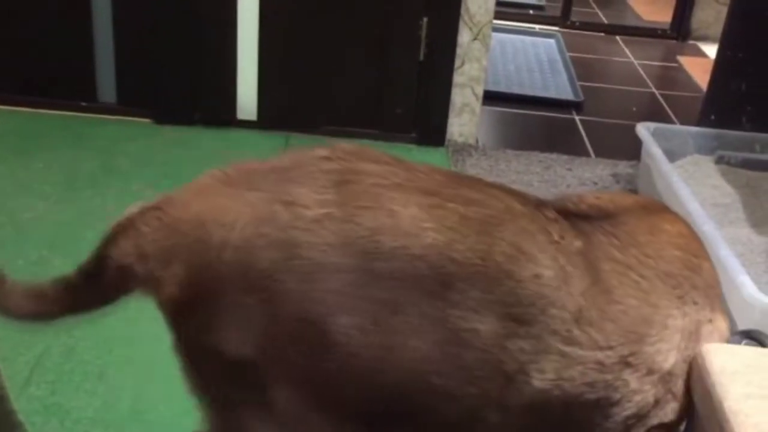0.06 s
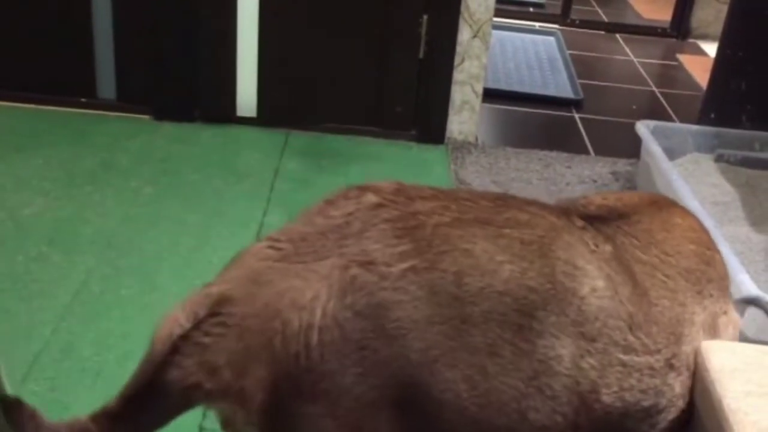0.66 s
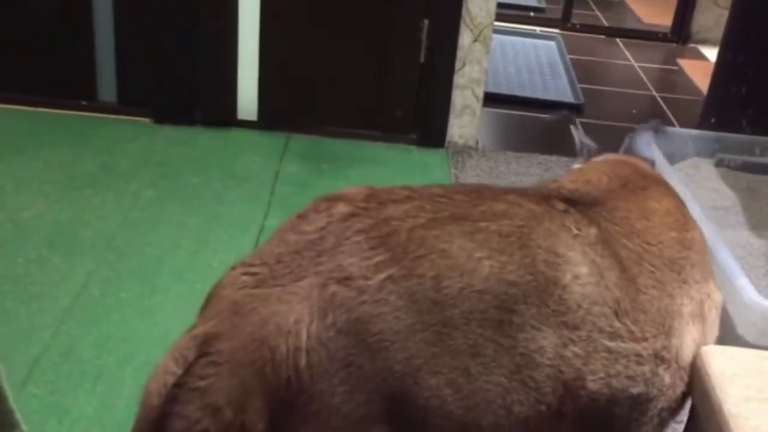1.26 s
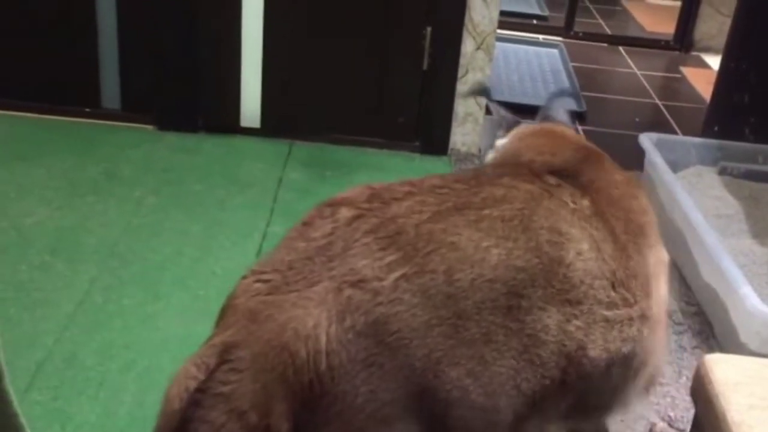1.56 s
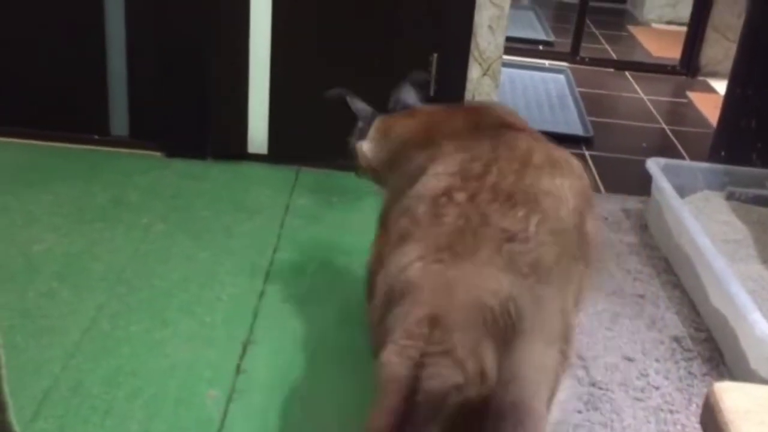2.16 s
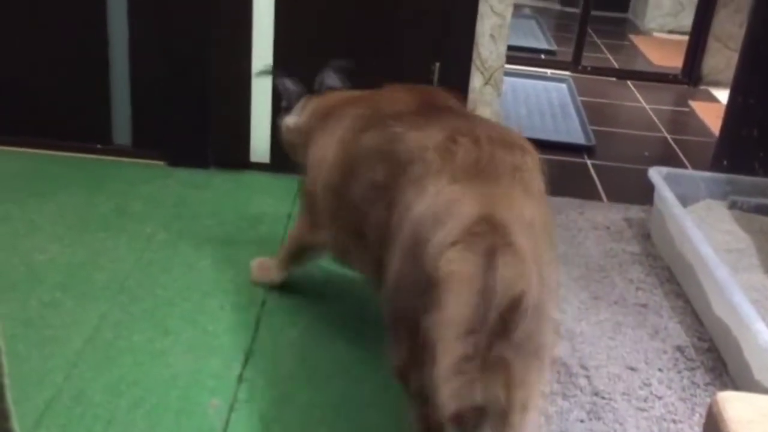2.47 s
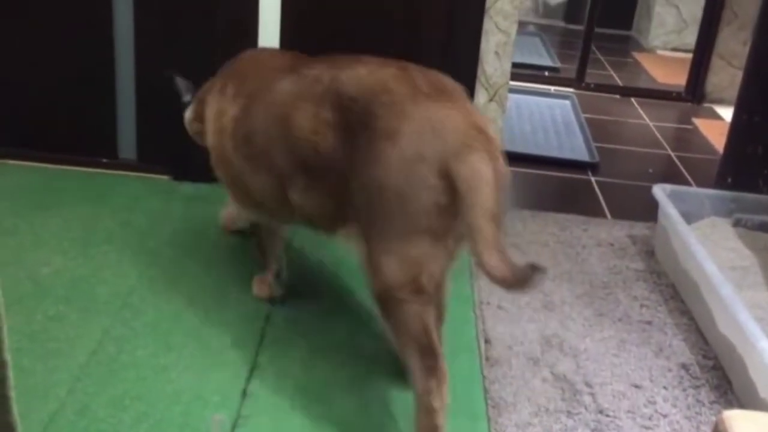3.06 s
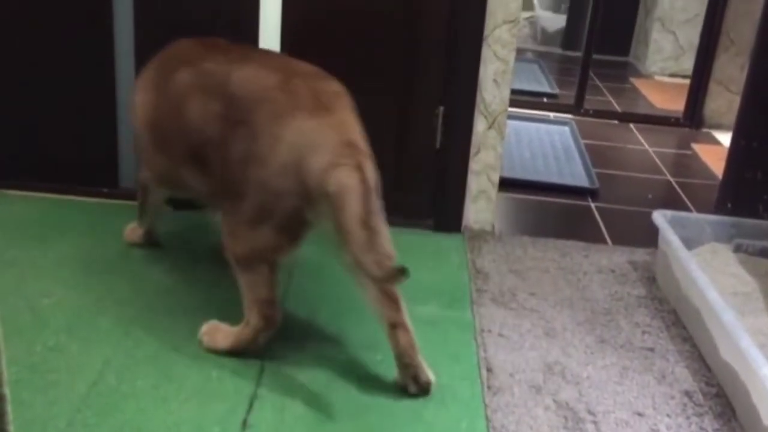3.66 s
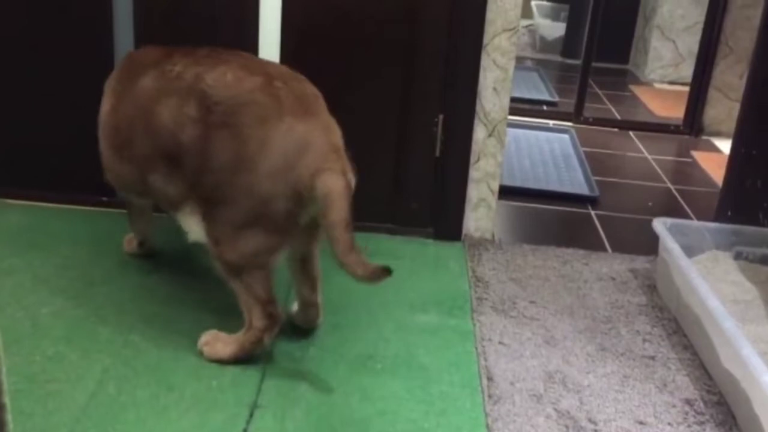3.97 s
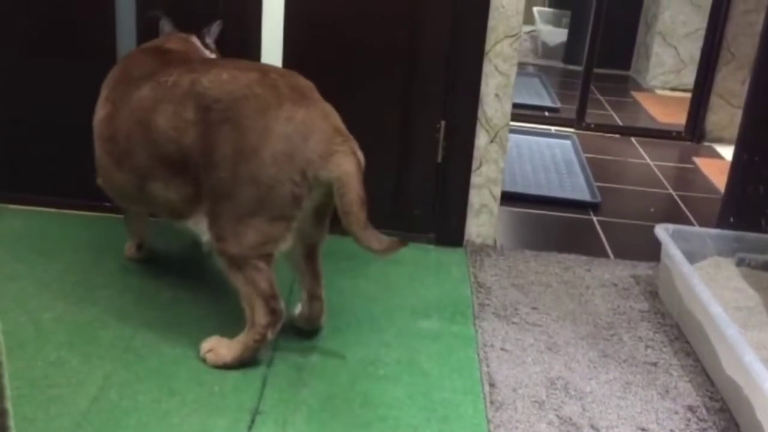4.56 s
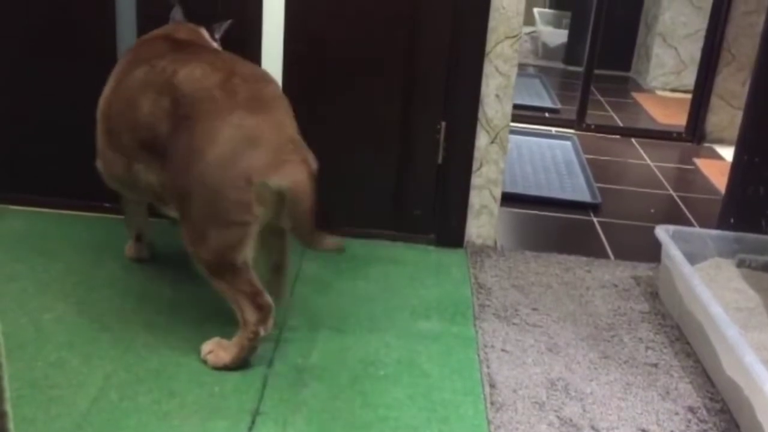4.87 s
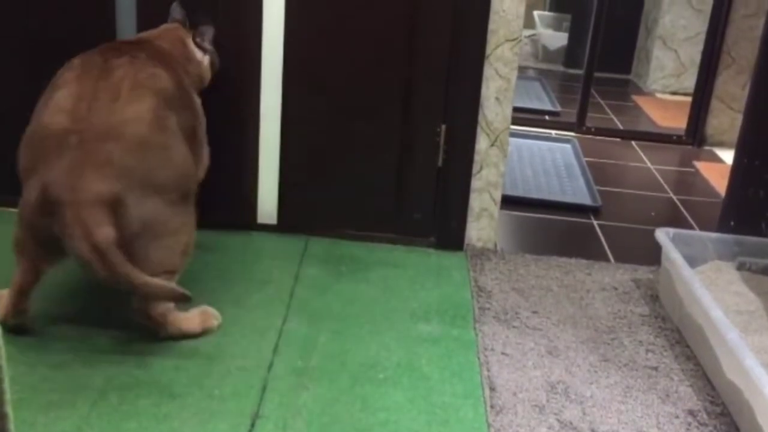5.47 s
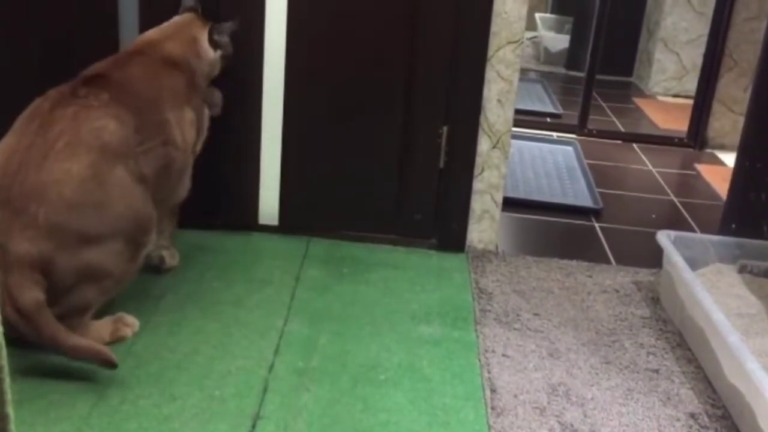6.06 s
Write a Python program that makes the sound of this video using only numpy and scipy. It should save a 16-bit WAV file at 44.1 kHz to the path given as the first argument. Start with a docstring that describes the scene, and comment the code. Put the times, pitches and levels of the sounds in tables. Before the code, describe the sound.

Soft paw steps, light claw ticks and clacks indoors, with one loud knock on a door panel and a faint steady fan hum.

```python
"""A cat at a closed door

A big cat leaves its plastic litter tray, pads across a matted floor and paws at a door in a small room.
Impacts excite damped modes: hollow tray knocks, light taps, footfalls that boom in the floor and,
loudest, one sharp knock on a panel. Friction of paws and claws gives short scuffs of noise.
The walls reflect these sounds over a quiet ventilation hum."""
import sys
import numpy as np
from scipy import signal
from scipy.fft import rfft, irfft
from scipy.io import wavfile

SR = 44100
rng = np.random.default_rng(int(sys.argv[2]) if len(sys.argv) > 2 else 0)


def digitize_waveform(pressure):
    """Quantize a signal to 16-bit integers and store it at the path in sys.argv[1].

    Rows of a 2-D input are taken as channels; values are limited to [-1, 1].
    """
    field = np.atleast_2d(pressure).T
    bounded = np.clip(field, -1, 1)
    quanta = np.round(bounded * 32767).astype(np.int16)
    wavfile.write(sys.argv[1], SR, quanta)


N = 278271

# reverberation time of the room: f/Hz, T60/s
ROOM_T60 = [(100, 0.74), (400, 0.2), (1000, 0.14), (2500, 0.17), (5000, 0.094), (12000, 0.2)]
# ventilation noise: f/Hz, relative level/dB
AIR_SPECTRUM = [(12, -56), (20, -14), (53, 2.5), (112, -1), (238, -7), (298, -10), (342, -7.5),
                (372, -13.5), (705, -17), (857, -17.5), (932, -17), (1670, -19), (2610, -21.5), (5000, -27),
                (6300, -27.5), (10200, -34), (11700, -34.5), (15500, -40)]
# fan tones: f/Hz, rms level/dB
FAN_TONES = [(49, -79), (65, -87), (122, -67), (171, -96), (242, -73.5), (339, -69)]

# friction noise of a paw: f/Hz, relative level/dB
RUB_SPECTRUM = [(100, 13), (350, -15), (900, -4), (2200, -6.5), (3500, -33), (6000, -73), (15000, -79)]
# hiss of claws: f/Hz, relative level/dB
HISS_SPECTRUM = [(1000, 13.5), (3500, 3), (6500, -3), (10000, -3), (14500, -1), (17000, -41)]
# faint pitched rubs: t/s, level/dB, f/Hz
SQUEAKS = [(0.508, -58, 713), (0.771, -62, 1504), (2.244, -59, 2540), (4.063, -46.5, 729),
           (5.214, -51.5, 624)]
# paws dragging on the mat: t/s, level/dB, length/s, resonance/Hz, relative hiss/dB
SCUFFS = [(1.626, -55, 0.06, 1640, -8), (1.697, -51, 0.03, 1690, -4), (2.048, -52, 0.069, 2550, 12),
          (2.588, -46.5, 0.034, 1930, 0), (3.1, -50.5, 0.068, 1670, 3), (3.397, -46.5, 0.04, 1130, -10),
          (3.85, -49.5, 0.055, 1650, -2), (3.962, -52.5, 0.044, 445, 0), (4.048, -48, 0.035, 1780, -4),
          (4.459, -60, 0.3, 2130, 5), (4.966, -57, 0.05, 1160, 7), (5.193, -44.5, 0.029, 3270, 1),
          (5.408, -44, 0.052, 1520, 2)]
SCUFF_CUTOFF_HZ = 7600  # low-pass on the hiss of a sliding paw
# claws raking the door: t/s, level/dB, rise/s, fall/s, rasp/Hz, relative half-width
SCRATCHES = [(5.779, -41.5, 0.012, 0.013, 2060, 0.064), (5.856, -42, 0.011, 0.0083, 1950, 0.13)]
# grit crushed under a paw: t/s, level/dB, fall/s
CRUNCHES = [(2.032, -48, 0.018), (2.0551, -42, 0.011), (2.068, -34, 0.0068)]
# cracking grit: f/Hz, relative level/dB
GRIT_SPECTRUM = [(300, -19), (800, 11), (1400, -5), (2700, 4.5), (3250, -19), (3900, -12), (4850, -18),
                 (6500, -12), (8000, -40), (12000, -26), (14500, -27), (16000, -32)]

# claw tips catching: t/s, level/dB, pitch ratio
CLAW_TICKS = [(0.2981, -33.5, 1.1), (0.3028, -28, 0.914), (0.3115, -42, 0.65), (1.5183, -41.5, 0.93),
              (2.034, -46, 0.78), (2.5741, -37, 0.65), (3.074, -40.5, 0.57), (3.388, -51, 0.74),
              (5.1894, -34, 0.82), (5.1912, -31.5, 0.94), (5.4103, -31, 0.87), (5.846, -42, 1.6)]
# modes struck by a claw tip: f/Hz, level/dB, T60/s
CLAW_MODES = [(1170, -10, 0.0099), (2380, 7, 0.0021), (4170, -1.5, 0.0078), (4800, -12, 0.014),
              (6200, -7.5, 0.0062), (12100, -11, .003)]
# light hard taps: t/s, level/dB, pitch ratio, contact cutoff/Hz, delay of second touch/s (0: none)
TAPS = [(0.2992, -32.5, 0.53, 1000, 0.0042), (0.3021, -24.5, 1.62, 1700, 0.00037),
        (0.3115, -36, 0.95, 1500, 0), (2.2365, -34.5, 1.27, 1500, 0.0009), (2.6, -31, 1.13, 4200, 0.0036),
        (3.088, -39.5, 1.03, 2330, 0.00042), (3.3963, -37, 1.48, 1100, 0.012), (3.8434, -37, 2.34, 1500, 0),
        (3.9648, -41, 0.73, 900, 0.0044), (4.0252, -35, 1, 3000, 0.019),
        (4.0429, -31.5, 0.66, 1100, 0.0018), (4.056, -40.5, 0.86, 900, 0.0038),
        (5.1451, -32, 1.16, 840, 0.0105), (5.2095, -40, 0.87, 900, 0), (5.3865, -39, 1.42, 1500, 0),
        (5.7378, -33.5, 1.64, 2300, 0.002), (5.7507, -40, 1.22, 2000, 0.002),
        (5.7655, -33, 1.01, 1600, 0.0035), (5.855, -39, 1.4, 1800, 0)]
# modes of a tap: f/Hz, level/dB, T60/s
TAP_MODES = [(431, -8, 0.033), (691, 12, 0.012), (845, 1, 0.01), (1640, 8, 0.0079), (2450, -0.5, 0.014),
             (3800, -14, 0.015), (6100, 0, 0.013)]
# the cat shifts its weight and leaves the tray: t/s, level/dB, pitch ratio, contact cutoff/Hz
TRAY_KNOCKS = [(0.5326, -38, 1, 900), (0.5525, -40.5, 0.92, 767), (1.609, -29.5, 1.01, 2400),
               (1.6325, -30, 0.99, 2300), (1.6912, -27.5, 1, 2700)]
# modes of the tray: f/Hz, level/dB, T60/s
TRAY_MODES = [(416, -1, 0.012), (692, -6.5, 0.06), (802, 8.5, 0.0098), (1100, -22, 0.012),
              (1620, -11, 0.012), (2240, -5, 0.0099)]
# a loose hard object underfoot: t/s, level/dB, pitch ratio, contact cutoff/Hz
CLACKS = [(2.0551, -22, 0.97, 4570), (2.0615, -31, 1, 4000), (2.0668, -20, 0.98, 4970),
          (2.0835, -31.5, 0.92, 3000)]
# modes of the loose object: f/Hz, level/dB, T60/s
CLACK_MODES = [(424, -9, 0.05), (517, 0.5, 0.026), (793, -3, 0.037), (924, 0, 0.017), (1300, -10, 0.029),
               (1830, -3, 0.031), (2080, 1.5, 0.011), (2800, -5.5, 0.021), (3830, -5.5, 0.012),
               (6400, -4.5, 0.0043)]
# a lone dry click: t/s, level/dB, pitch ratio, bass cutoff/Hz, contact cutoff/Hz
CLICK = [(2.4764, -21, 0.94, 480, 3600)]
# modes of the click: f/Hz, level/dB, T60/s
CLICK_MODES = [(483, -8, 0.035), (900, 5.5, 0.011), (1340, 1, 0.0087), (2590, 4, 0.0072),
               (2950, -12, 0.007), (5250, -10.5, 0.011)]

# steps: t/s, level/dB, pitch ratio, roll time/s, pad scuff/dB, boom f/Hz, boom level/dB, boom T60/s
FOOTFALLS = [(0.2993, -26, 1.05, 0.0088, -33, 117.5, -26.5, 0.23),
             (2.2237, -29, 1.1, 0.026, -40.5, 95, -21.5, 0.12),
             (2.881, -40, 0.87, 0.0067, -46.5, 115, -56, 0.15),
             (4.028, -35.5, 1.17, 0.02, -40, 103, -34.5, 0.11),
             (5.153, -38, 1.08, 0.01, -50, 81, -39, 0.14), (5.194, -45, 0.98, 0.022, -44, 92.5, -41, 0.13),
             (5.384, -43.5, 1.17, 0.0072, -51, 130, -45.5, 0.15),
             (5.847, -42, 0.76, 0.0034, -39, 132, -40, 0.059)]
# toes, pad, full weight: share of the roll, relative level/dB, pitch ratio, bass cutoff/Hz,
# contact cutoff/Hz
PAW_ROLL = [(0, -2, 1.007, 213, 785), (0.547, -5.5, 1.196, 138, 423), (0.999, 0, 0.968, 90, 264)]
# modes of the floor: f/Hz, level/dB, T60/s
FLOOR_MODES = [(132.6, 2.5, 0.078), (163, -2.5, 0.028), (189.4, -1.5, 0.094), (311, -0.5, 0.058),
               (345, -3.5, 0.16)]

# the blow on the panel: t/s, level/dB, pitch ratio, bass cutoff/Hz, contact cutoff/Hz
KNOCK = [(2.6092, -4.2, 1, 240, 2600)]
# the panel's broad, quickly damped modes and its faint lasting ones: f/Hz, level/dB, T60/s
PANEL_MODES = [(385, -1, .026), (480, -5, .02), (700, -14, .014), (960, -8, .011), (1400, -11, .009),
               (1900, -5, .008), (2250, -11, .01), (2900, -18, .008), (3800, -21, .007), (206, -12, .125),
               (290, -31, .18), (357, -31, .3), (393, -27, .28), (483, -29, .18), (573, -30, .17),
               (596, -29, .2), (688, -36, .22), (855, -26, .15), (912, -29, .15), (1004, -25, .13),
               (1050, -28, .13), (1190, -34, .12), (1770, -33, .11), (1915, -34, .1), (2044, -31, .12),
               (2155, -32, .13)]
# first reflections off the floor and the nearest wall: delay/s, relative level/dB
KNOCK_ECHOES = [(0.0069, -12), (0.0118, -13)]


def undb(db):
    """Amplitude ratio of a level in decibels."""
    return 10 ** (np.asarray(db) / 20)


def unit(x):
    """Normalisation to rms 1."""
    return x / np.sqrt(np.mean(x ** 2))


def along(hz, points):
    """Interpolation of (f/Hz, value) points on a logarithmic frequency axis."""
    f, value = np.transpose(points)
    return np.interp(np.log(np.maximum(hz, 1)), np.log(f), value)


def colour(x, spectrum):
    """Spectral shaping by (f/Hz, level/dB) points, at rms 1."""
    gain = undb(along(np.fft.rfftfreq(len(x), 1 / SR), spectrum))
    return unit(irfft(rfft(x) * gain, len(x)))


def cut(x, hz, kind, order=2):
    """Butterworth filtering."""
    return signal.sosfilt(signal.butter(order, np.minimum(hz, SR / 2 - 1), kind, fs=SR, output="sos"), x)


def add(track, s, sound):
    """Superposition of a sound on a track at time s."""
    start = int(s * SR)
    part = sound[:len(track) - start]
    track[start:start + len(part)] += part


def drift(rate_hz):
    """Slow random fluctuation: low-passed noise at rms 1."""
    gain = np.exp(-(np.fft.rfftfreq(N, 1 / SR) / rate_hz) ** 2)
    return unit(irfft(rfft(rng.standard_normal(N)) * gain, N))


def even_noise(count, size=512):
    """Random-phase noise: a flat spectrum in each short block leaves it without pitch."""
    phases = rng.random((count // size + 1, size // 2 + 1))
    return unit(irfft(np.exp(2j * np.pi * phases), size).ravel()[:count])


def room(x, wet_db, low_hz, high_hz, gap_s=0.00059, build_s=0.00024):
    """Reverberation: dense reflections follow the direct sound, each band decaying at its own rate."""
    t = np.arange(SR // 2) / SR
    onset = np.clip((t - gap_s) / build_s, 0, 1)
    edges = np.geomspace(60, 16000, 11)
    tail = 0
    for lo, hi in zip(edges, edges[1:]):
        decay = np.exp(-np.log(1000) * t / along(np.sqrt(lo * hi), ROOM_T60))
        band = cut(even_noise(len(t)), [lo, hi], "bandpass") * decay * onset
        tail = tail + band * np.sqrt(2 * (hi - lo) / SR / np.sum(band ** 2))  # equal energy per hertz
    tail = cut(cut(tail, low_hz, "highpass"), high_hz, "lowpass", order=1)
    return x + undb(wet_db) * signal.fftconvolve(x, tail)[:N]


def ring(modes, pitch=1):
    """Free vibration: the impulse response is a sum of exponentially damped sinusoids."""
    t = np.arange(SR // 2) / SR
    return sum(undb(db) * np.sin(2 * np.pi * hz * pitch * t) * np.exp(-np.log(1000) * t / t60)
               for hz, db, t60 in modes)


def impacts(rows, modes, travel_s):
    """Impact excitation: a softer contact excites less treble, a lighter one less bass."""
    out = np.zeros(N)
    for s, db, pitch, low_hz, contact_hz in rows:
        blow = cut(cut(ring(modes, pitch), low_hz, "highpass"), contact_hz, "lowpass")
        # dispersion: bending waves carry treble faster than bass; travel_s is their delay at 1 kHz
        lag_cycles = 2 * travel_s * np.sqrt(1000 * np.fft.rfftfreq(len(blow), 1 / SR))
        blow = irfft(rfft(blow) * np.exp(-2j * np.pi * lag_cycles), len(blow))
        add(out, s, blow * undb(db) / np.abs(blow).max())
    return out


def friction(rows, resonance_db, width, glide_per_s=0):
    """Sliding friction: dense, uneven slips drive a broad rub, one resonance and the hiss of claws."""
    out = np.zeros(N)
    t = np.arange(-SR // 8, SR // 4) / SR  # zero at the greatest pressure
    for s, db, rise_s, fall_s, hz, hiss_db, cutoff_hz in rows:
        slips = rng.standard_normal((3, len(t))) * rng.exponential(size=len(t))
        resonance = unit(cut(slips[0], [hz / (1 + width), hz * (1 + width)], "bandpass", order=1))
        resonance = np.interp(t + glide_per_s * t ** 2 / 2, t, resonance)
        hiss = cut(colour(slips[2], HISS_SPECTRUM), cutoff_hz, "lowpass")
        rub = colour(slips[1], RUB_SPECTRUM) + undb(resonance_db) * resonance + undb(hiss_db) * hiss
        pressure = np.exp(-(np.minimum(t, 0) / rise_s) ** 2 - np.maximum(t, 0) / fall_s)
        add(out, s + t[0], undb(db) * pressure * unit(rub))
    return room(out, wet_db=-3.0, low_hz=240, high_hz=4040)


def ventilation(air_db=-54.5, waver=0.29, phase_rad=1.46):
    """Broadband flow noise with fan tones under slow, random amplitude and phase modulation."""
    t = np.arange(N) / SR
    out = colour(rng.standard_normal(N), AIR_SPECTRUM) * undb(air_db)
    for hz, db in FAN_TONES:
        amplitude = undb(db) * np.sqrt(2) * (1 + waver * drift(1.6))
        out += amplitude * np.sin(2 * np.pi * hz * t + phase_rad * drift(1.95))
    return out


def squeaks(rise_s=0.032, fall_s=0.011, hiss_db=-15):
    """Sharp resonance: one narrow band dominates a slow rub and gives it a pitch."""
    rows = [(s, db, rise_s, fall_s, hz, hiss_db, SCUFF_CUTOFF_HZ) for s, db, hz in SQUEAKS]
    return friction(rows, resonance_db=23, width=0.004)


def scuffs(rise_share=0.4, fall_share=0.39):
    """Friction of paws on the mat: a longer drag swells and fades more slowly."""
    rows = [(s, db, rise_share * length_s, fall_share * length_s, hz, hiss_db, SCUFF_CUTOFF_HZ)
            for s, db, length_s, hz, hiss_db in SCUFFS]
    return friction(rows, resonance_db=-2.5, width=0.049)


def pad_scuffs(peak_share=0.72, rise_share=0.75, fall_share=0.56, resonance_hz=705, hiss_db=-16):
    """Friction of a landing pad, which slides a little for as long as the paw rolls."""
    rows = [(s + peak_share * roll_s, db, rise_share * roll_s, fall_share * roll_s,
             resonance_hz, hiss_db, SCUFF_CUTOFF_HZ) for s, _, _, roll_s, db, *_ in FOOTFALLS]
    return friction(rows, resonance_db=-5.0, width=0.061)


def scratches(hiss_db=1.5, cutoff_hz=13000):
    """Friction of claws on the door: the rasp rises in frequency as the stroke speeds up."""
    strokes = np.zeros(N)
    for s, db, rise_s, fall_s, hz, width in SCRATCHES:
        stroke = (s, db, rise_s, fall_s, hz, hiss_db, cutoff_hz)
        strokes += friction([stroke], resonance_db=3.0, width=width, glide_per_s=5.7)
    return cut(strokes, 600, "highpass")


def crunches(spread_db=3.0):
    """Brittle fracture: grit cracks under a paw in a dense, uneven burst that dies away."""
    out = np.zeros(N)
    t = np.arange(SR // 8) / SR
    for s, db, fall_s in CRUNCHES:
        grains = rng.standard_normal(len(t))
        grains *= undb(spread_db * np.minimum(rng.exponential(size=len(t)), 5))
        add(out, s, undb(db) * np.exp(-t / fall_s) * colour(grains, GRIT_SPECTRUM))
    return room(out, wet_db=0.5, low_hz=400, high_hz=6000)


def claw_ticks(low_hz=1000, contact_hz=3470):
    """Light, hard contact: a catching claw excites high, short-lived modes."""
    rows = [(s, db, pitch, low_hz, contact_hz) for s, db, pitch in CLAW_TICKS]
    direct = impacts(rows, CLAW_MODES, travel_s=0.001249)
    return room(direct, wet_db=-0.5, low_hz=397, high_hz=4000)


def taps(low_hz=427, second_touch_db=-5.5):
    """Light impacts, many landing twice, ring hollowly and blend with their reflections."""
    rows = []
    for s, db, pitch, contact_hz, again_s in TAPS:
        rows.append((s, db, pitch, low_hz * pitch, contact_hz))
        if again_s > 0:
            rows.append((s + again_s, db + second_touch_db, pitch, low_hz * pitch, contact_hz))
    direct = impacts(rows, TAP_MODES, travel_s=0.000978)
    return room(direct, wet_db=0.0, low_hz=407, high_hz=6000, gap_s=0.00096, build_s=0.0018)


def litter_tray(low_hz=378, rebound_s=0.00261, rebound_db=-7):
    """Impact and rebound: each knock excites the hollow modes of the plastic tray twice."""
    rows = []
    for s, db, pitch, contact_hz in TRAY_KNOCKS:
        rows.append((s, db, pitch, low_hz, contact_hz))
        rows.append((s + rebound_s, db + rebound_db, pitch, low_hz, contact_hz))
    direct = impacts(rows, TRAY_MODES, travel_s=0.000754)
    return room(direct, wet_db=-5.0, low_hz=450, high_hz=5000, gap_s=0.0045, build_s=0.0016)


def clacks(low_hz=396):
    """Repeated impact: a loose hard object underfoot gives two strong clacks and two weak ones."""
    rows = [(s, db, pitch, low_hz * pitch, contact_hz) for s, db, pitch, contact_hz in CLACKS]
    direct = impacts(rows, CLACK_MODES, travel_s=0.001373)
    return room(direct, wet_db=-5.0, low_hz=450, high_hz=3220, gap_s=0.0031)


def click():
    """Heavy damping: the modes die so quickly that one impact is heard as a dry click."""
    direct = impacts(CLICK, CLICK_MODES, travel_s=0.001)
    return room(direct, wet_db=-5.5, low_hz=380, high_hz=4500, gap_s=0.004)


def footfalls(band_ratio=1.27):
    """Soft contact: a rolling paw excites only low floor modes, and its full weight sets off a boom."""
    rows = [(s + share * roll_s, db + part_db, pitch * part_pitch, low_hz, contact_hz)
            for s, db, pitch, roll_s, *_ in FOOTFALLS
            for share, part_db, part_pitch, low_hz, contact_hz in PAW_ROLL]
    direct = impacts(rows, FLOOR_MODES, travel_s=0.0001)
    out = room(direct, wet_db=-5.0, low_hz=228, high_hz=2000)
    for s, _, _, roll_s, _, boom_hz, boom_db, boom_t60 in FOOTFALLS:
        boom = ring([(boom_hz, boom_db, boom_t60)])
        band_hz = [boom_hz / band_ratio, boom_hz * band_ratio]  # a narrow band makes the boom swell
        add(out, s + roll_s, cut(boom, band_hz, "bandpass", order=1))
    return out


def panel_crack(level_db=-16, lag_s=0.0016, rise_s=0.00021, fall_s=0.0013):
    """Contact noise: a burst of a few milliseconds at the knock, filtered down to its bright band."""
    resonance_hz, hiss_db, cutoff_hz = 3740, -31, 2500
    rows = [(s + lag_s, level_db, rise_s, fall_s, resonance_hz, hiss_db, cutoff_hz) for s, *_ in KNOCK]
    burst = friction(rows, resonance_db=-13.5, width=0.11)
    return cut(burst, [1970, 7250], "bandpass")


def panel_knock():
    """Plate vibration: one hard blow rings the panel; its echoes and reverberation carry little bass."""
    direct = cut(impacts(KNOCK, PANEL_MODES, travel_s=0.00099), [145, 9000], "bandpass")
    out = room(direct, wet_db=-3.8, low_hz=680, high_hz=2600, gap_s=0.004, build_s=0.014)
    for delay_s, db in KNOCK_ECHOES:
        add(out, delay_s, undb(db) * cut(direct, 610, "highpass"))
    return out


def scene():
    """Superposition of all sources, the same in both channels."""
    paws = footfalls() + pad_scuffs() + scuffs() + squeaks() + claw_ticks() + scratches() + crunches()
    objects = litter_tray() + taps() + clacks() + click() + panel_knock() + panel_crack()
    mix = paws + objects + ventilation()
    return np.array([mix, mix])


def record(dry):
    """Band limiting: a phone passes neither the deepest bass nor the highest treble."""
    low_hz, top_hz = 42, 15600
    lowpass = signal.ellip(10, .1, 70, top_hz, fs=SR, output="sos")
    return signal.sosfilt(lowpass, cut(dry, low_hz, "highpass", order=3))


dry = scene()
out = record(dry)
digitize_waveform(out)
```